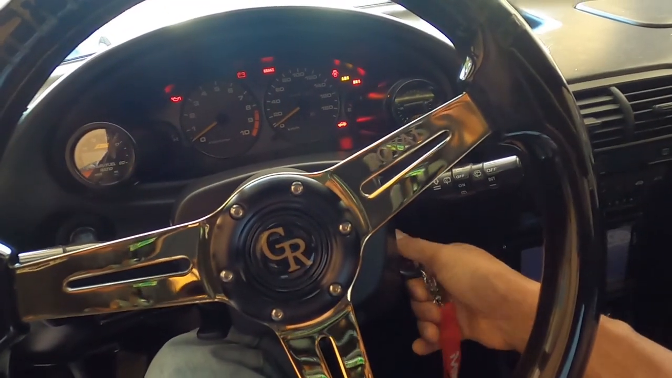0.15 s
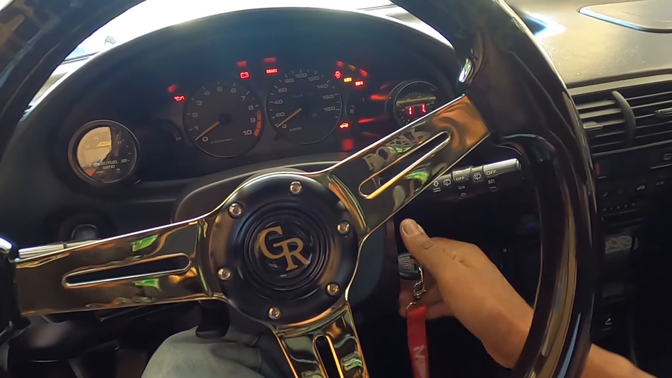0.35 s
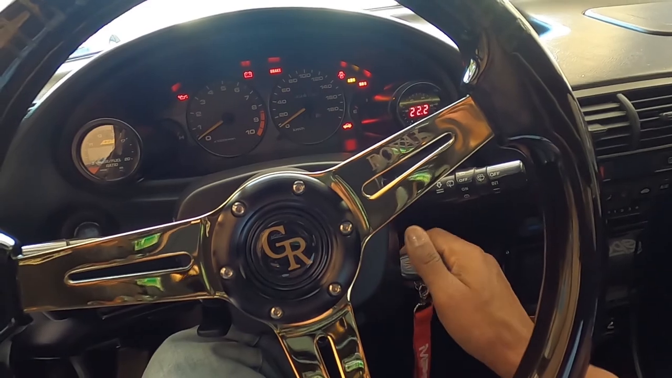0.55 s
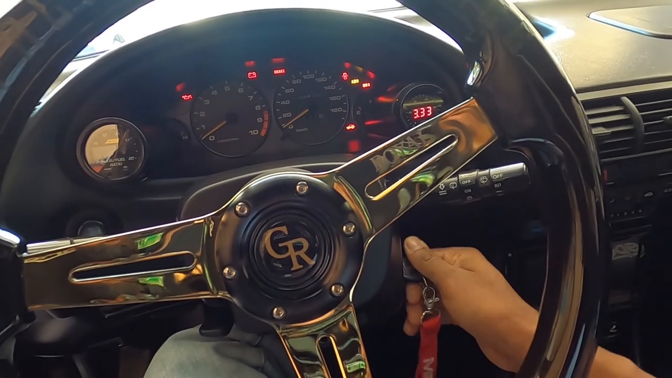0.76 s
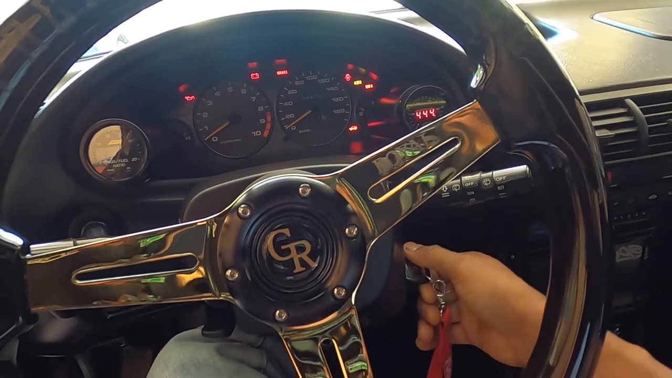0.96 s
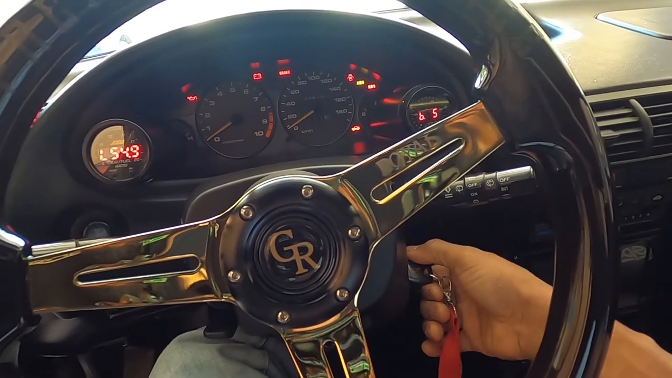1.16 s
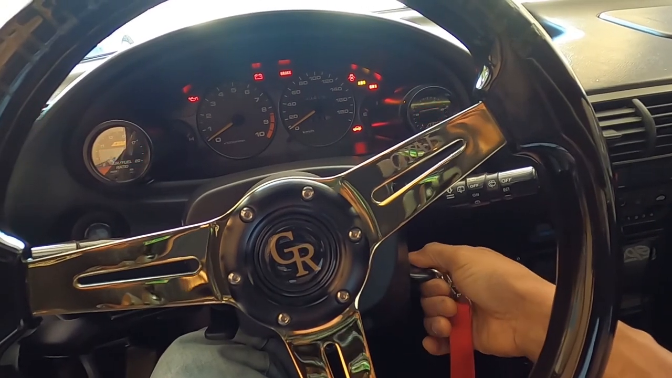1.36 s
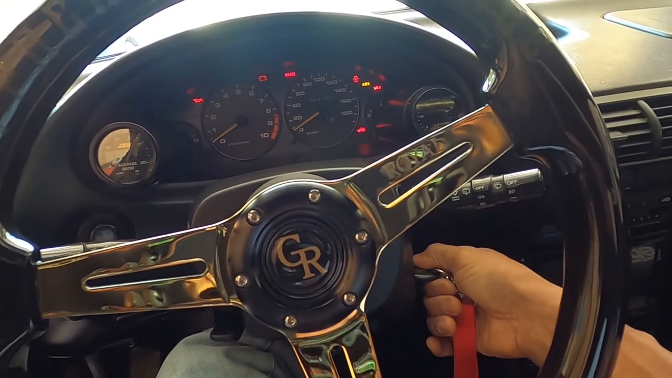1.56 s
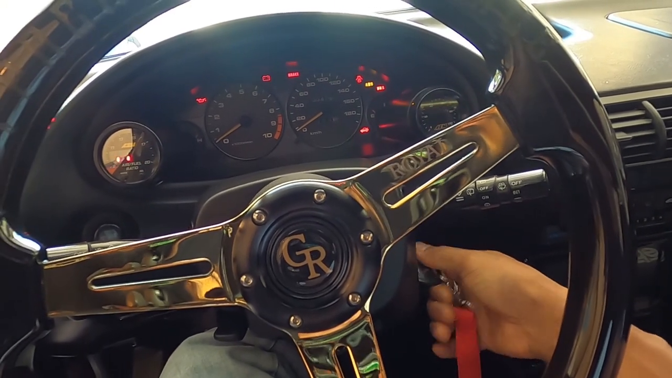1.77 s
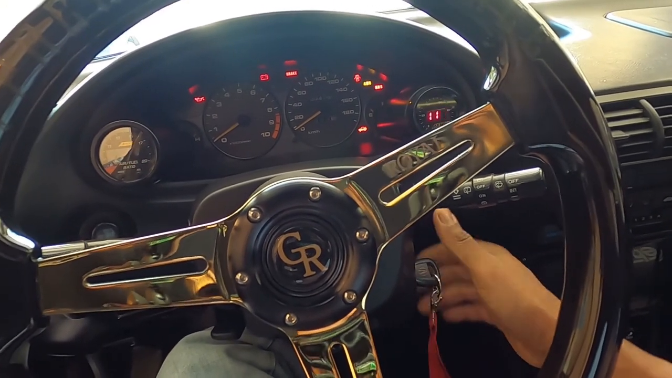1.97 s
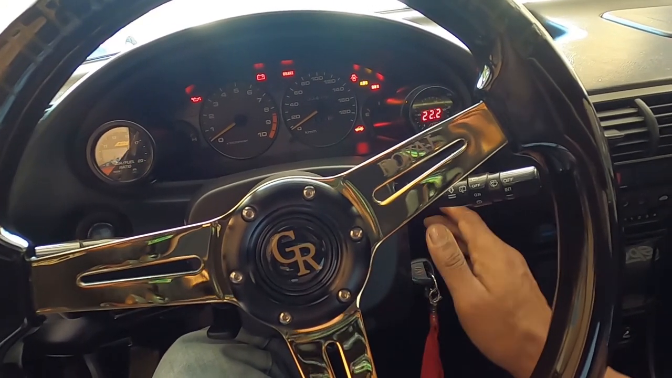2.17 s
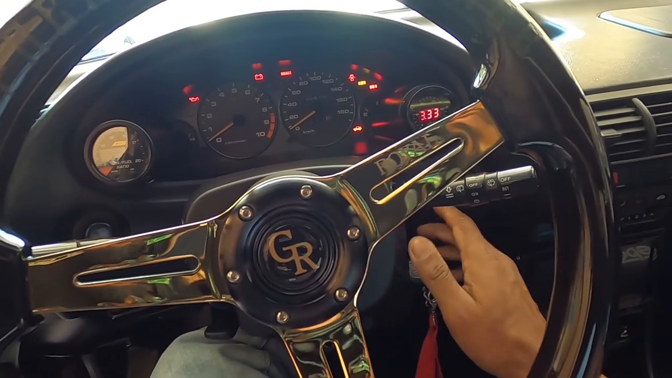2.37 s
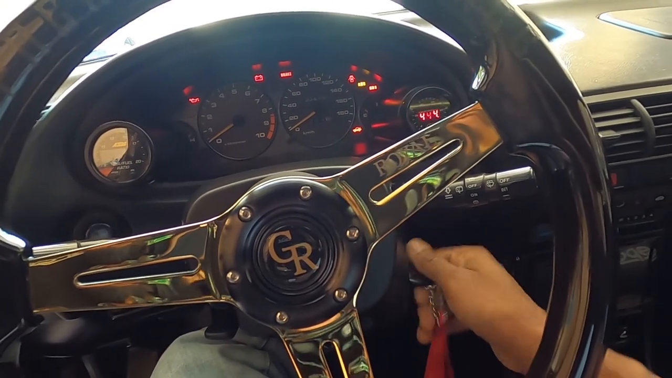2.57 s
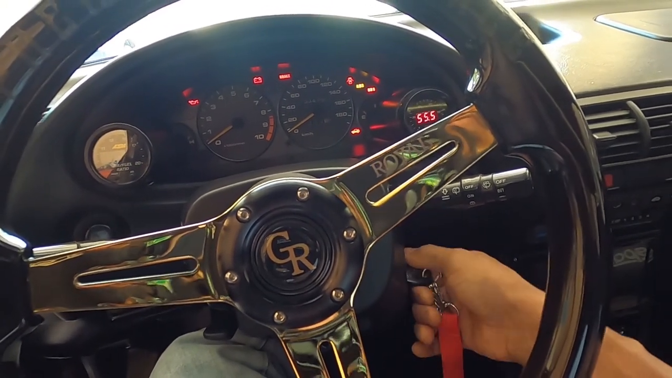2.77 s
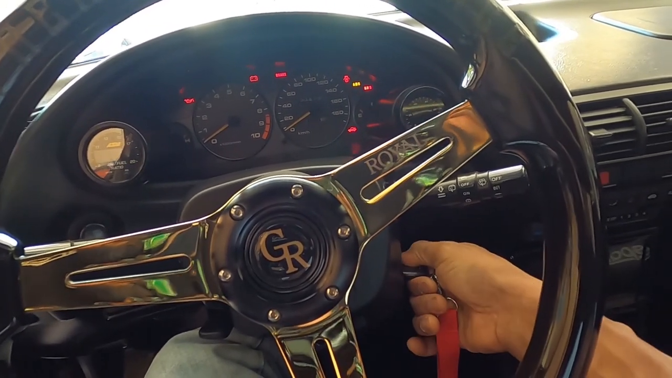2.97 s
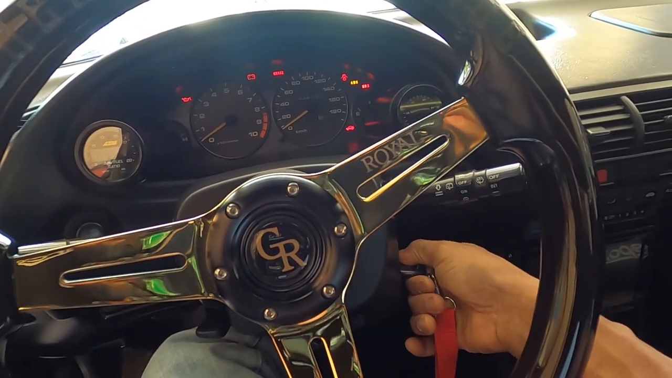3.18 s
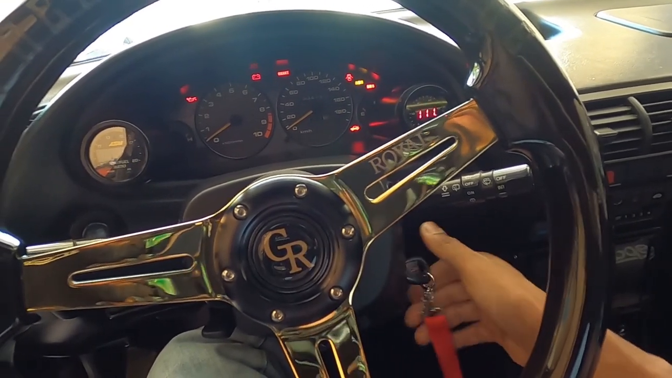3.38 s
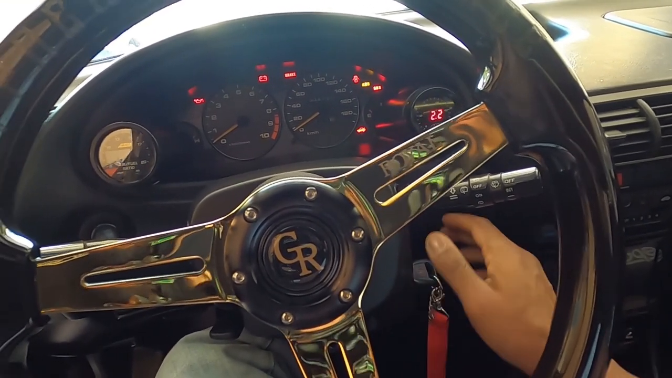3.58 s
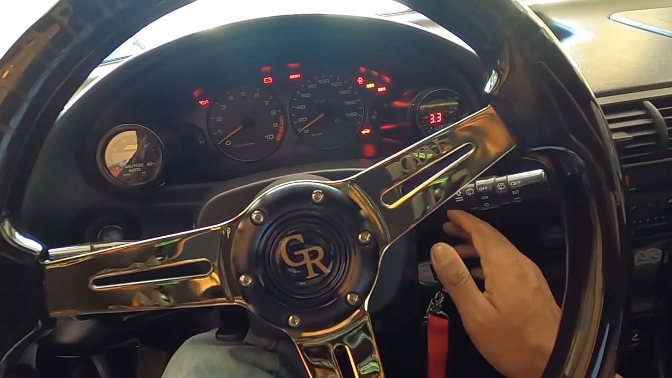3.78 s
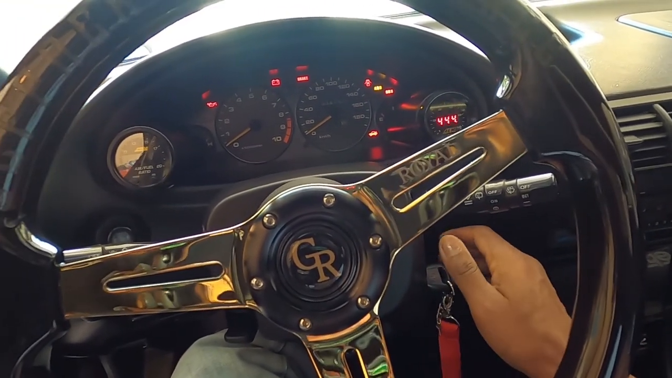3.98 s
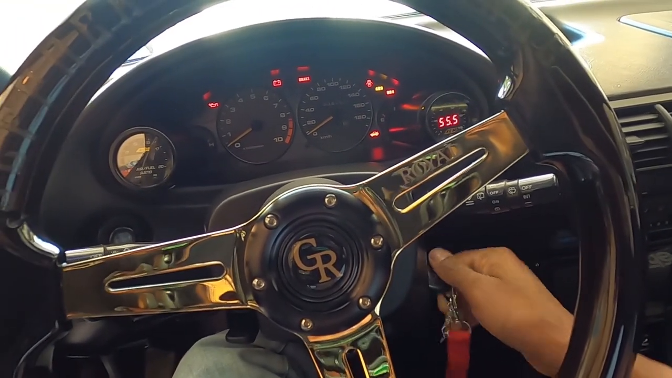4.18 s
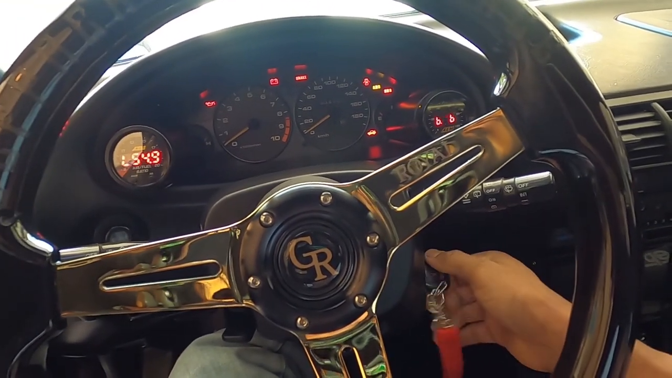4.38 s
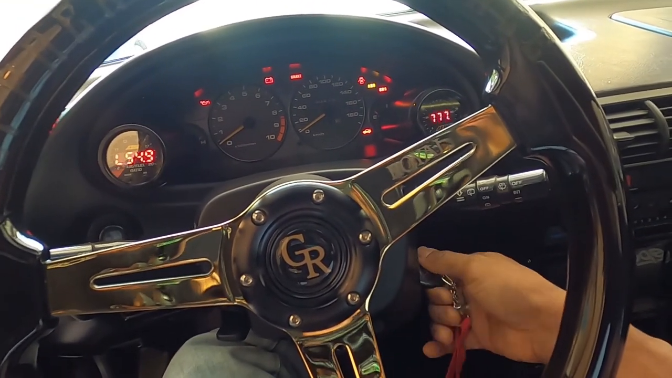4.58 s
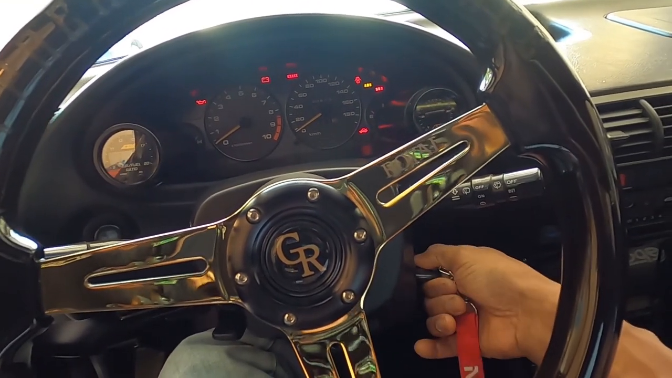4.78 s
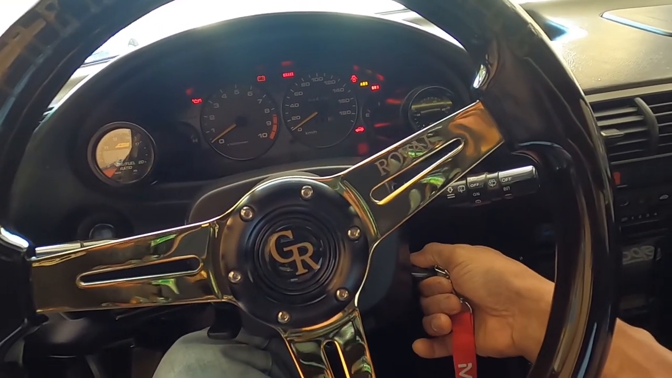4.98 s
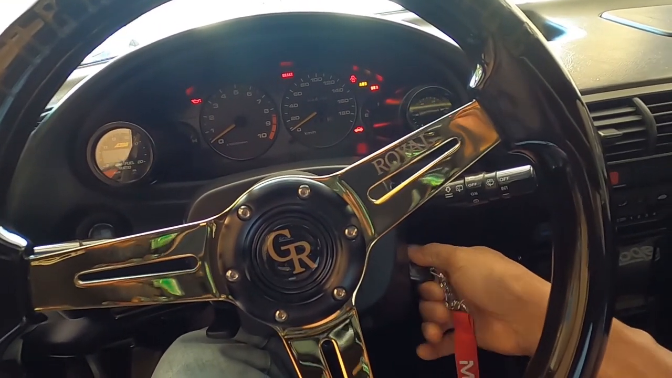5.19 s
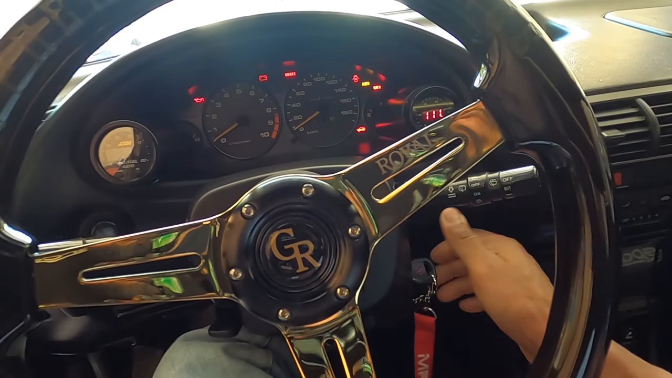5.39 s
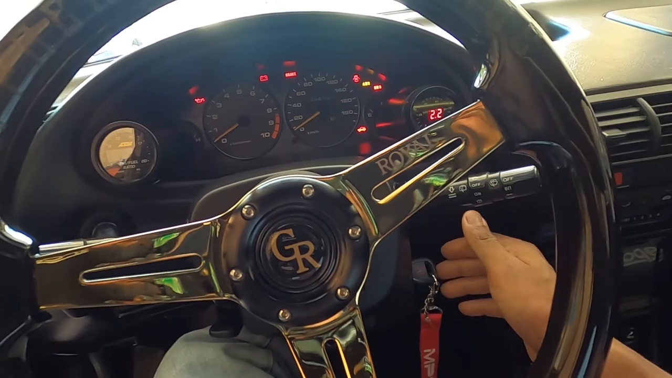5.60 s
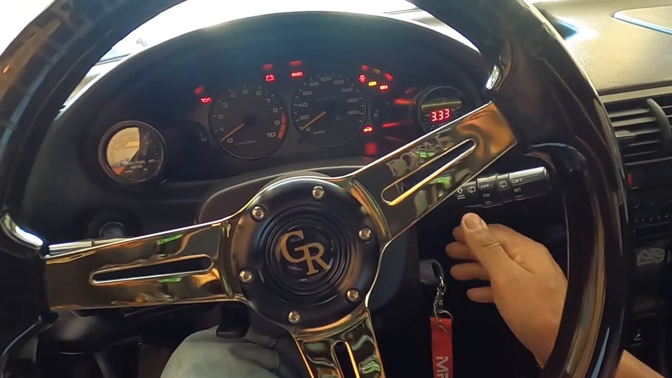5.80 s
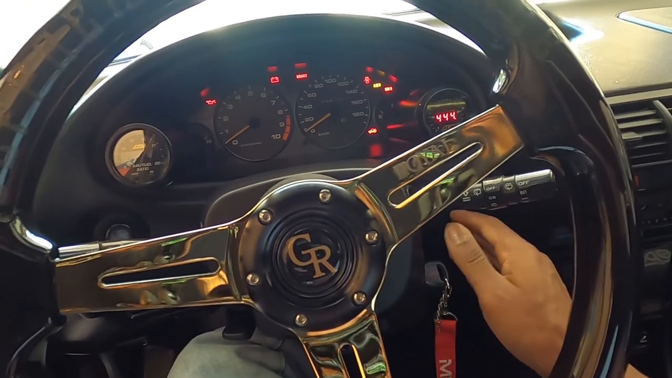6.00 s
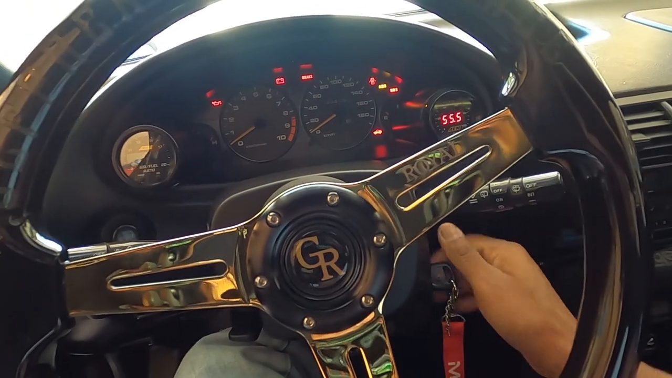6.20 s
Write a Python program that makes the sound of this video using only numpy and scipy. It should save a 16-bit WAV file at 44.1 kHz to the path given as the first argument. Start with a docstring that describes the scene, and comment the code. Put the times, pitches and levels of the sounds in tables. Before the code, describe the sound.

Inside a car, a key clicks and the starter grinds in short whirring bursts, cabin booming deeply; the engine never catches, keys tinkle between.

```python
"""Inside a car in a garage: the ignition key is turned four times, the engine never catches.
Noise through housing modes and a rising gear whine make the starter; beating sines near 42 Hz make the
cabin boom as the engine rocks on its mounts. On release the key springs back and the starter coasts down.
Noise bursts make the lock clicks, decaying sines the key rings, sines and soft noise the hum and rush."""
import sys
import numpy as np
from scipy import signal
from scipy.fft import rfft, irfft, next_fast_len
from scipy.io import wavfile
from scipy.ndimage import map_coordinates

SR = 44100
rng = np.random.default_rng(int(sys.argv[2]) if len(sys.argv) > 2 else 0)


def output_pcm(signal):
    """Save a mono or channel-first signal as 16-bit PCM at the path in sys.argv[1].

    Samples are clipped to [-1, 1] before scaling.
    """
    pcm = np.clip(np.atleast_2d(signal).T, -1, 1) * 32767
    wavfile.write(sys.argv[1], SR, np.round(pcm).astype(np.int16))


N = 275622

# tries: starter on t/s, key released t/s, coasting time/s, gear mesh spin-up/(Hz/s),
# rel. grind level/dB, rel. whine level/dB, rel. release level/dB
TRIES = [(-.19, 0.157, 0.4, 4000, -33, 5, -29), (1.463, 1.868, 0.41, 3698, -33.5, 4, -26),
         (2.938, 3.341, 0.52, 4102, -34, 2, -24.5), (4.768, 5.298, 0.76, 4100, -33, 6.5, -26.5)]
# starter heaves the engine over: t/s, rel. level/dB, hold/s, rocking f/Hz, rel. after-swing level/dB,
# beat period/s, rel. compression stroke level/dB
HEAVES = [(-.065, -11, 0.18, 44.2, -19.5, 0.238, -34.5), (1.538, -9.5, 0.15, 43.55, -18, 0.2264, -33.5),
          (3.015, -11, 0.21, 43.2, -20, 0.217, -30.5), (4.825, -11, .21, 42.84, -34, 0.18, -33.5),
          (5.152, -10.5, .16, 50.5, -38.5, 0.74, -44.5), (5.361, -10.5, 0.1165, 49.37, -16, 0.293, -54)]
# spectrum of the loaded grind: f/Hz, rel. density/dB
GRIND_SPECTRUM = [(260, -28.5), (450, -19), (560, -11), (737, -5.5), (827, -7), (938, 2), (1020, -2.5),
                  (1390, -4.5), (2050, -10.5), (2410, -9), (2860, -17), (5310, -22), (7000, -31.5),
                  (9100, -61.5), (15400, -120)]
# left-right likeness of wide sounds: f/Hz, likeness [0-1]
WIDE_LIKENESS = [(100, 1), (250, .98), (500, .92), (1000, .84), (2000, .7), (4000, .33), (8000, .05)]
# left-right likeness of near sounds: f/Hz, likeness [0-1]
NEAR_LIKENESS = [(300, 0.99), (1000, 0.84), (4000, 0.63), (9000, 0.11)]
# resonances of the plastic column shroud: f/Hz, width/Hz, rel. level/dB
SHROUD_MODES = [(1034, 28, 4), (1200, 140, 3.5), (1460, 24, -5), (1723, 210, 1), (2380, 40, 3.5),
                (2820, 28, -1), (3205, 35, -2.8)]


def amp(db):
    """Decibels to gain."""
    return 10 ** (np.asarray(db) / 20)


def unit(x):
    """Scale to rms 1."""
    return x / np.sqrt(np.mean(x ** 2) + 1e-20)


def clock():
    """Time of each sample, s."""
    return np.arange(N) / SR


def along(points, hz):
    """Interpolate (Hz, value) points on a log frequency axis."""
    f, v = np.transpose(points)
    return np.interp(np.log(hz + 1), np.log(f + 1), v)


def gate(start, end, rise, fall):
    """Linear rise from start, hold, exponential decay after end."""
    t = clock()
    return np.clip((t - start) / rise, 0, 1) * np.exp(-np.maximum(t - end, 0) / fall)


def swell(s, length):
    """Gaussian rise and fall around time s."""
    return np.exp(-((clock() - s) / length) ** 2)


def burst(s, rise, t60):
    """Envelope of one contact."""
    return gate(s, s + rise, rise, t60 / np.log(1000))


def wobble(rate):
    """Smooth random curve, rate knots a second."""
    knots = rng.standard_normal(int(N * rate / SR) + 4)
    return map_coordinates(knots, [clock() * rate])


def noise():
    """Two unrelated white noises."""
    return rng.standard_normal((2, N))


def filtered(x, response):
    """Apply a response of frequency to x."""
    m = next_fast_len(N + SR // 2)
    return irfft(rfft(x, m) * response(np.fft.rfftfreq(m, 1 / SR)), m)[..., :N]


def ringing(x, modes, ring_db, direct=1):
    """x scaled by direct, plus x through parallel second-order resonances."""
    def response(f):
        total = direct
        for center, width, db in modes:
            damping = 1j * f * width
            total = total + amp(db + ring_db) * damping / (center * center - f * f + damping)
        return total
    return filtered(x, response)


def spread(pair, spectrum, alike, lean_db=0):
    """Colour two unrelated signals, blend to the given left-right likeness, lean by lean_db to the left."""
    def response(hz):
        turn = np.arccos(np.clip(along(alike, hz), -1, 1)) / 2
        return unit(amp(along(spectrum, hz))) * [np.cos(turn), np.sin(turn)]
    mid, side = filtered(pair, response)
    return np.array([mid + side, mid - side]) * amp([[lean_db / 2], [-lean_db / 2]])


def echo(x, t60):
    """Diffuse decaying noise tail for each ear, scaled to unit energy on the left."""
    t = np.arange(SR // 2) / SR
    tail = rng.standard_normal((2, len(t))) * amp(-60 * t / t60)
    return signal.fftconvolve(np.atleast_2d(x), tail / np.linalg.norm(tail[0]), axes=1)[:, :N]


def garage():
    """Mains hum (sine harmonics) over the faint rush of the room; both sink with each heave and recover."""
    # hum partials: f/Hz, rel. level/dB
    hum_partials = [(51.1, -42.5), (102.2, -37.5), (153.2, -51), (204.4, -55), (306.6, -66.5)]
    # room rush: f/Hz, rel. density/dB
    air_spectrum = [(15, -25.5), (25, 1.5), (112, -12), (150, -12), (224, -17), (354, -54), (415, -34.5),
                    (879, -55.5), (1090, -42), (1500, -39.5), (2240, -48), (9020, -62.5), (10600, -95.5),
                    (15000, -90)]
    far_spectrum = [(300, 7.5), (600, -4.5), (1100, -5.5), (1600, -11.5), (2400, -4.0), (4000, -16.5),
                    (9000, -33.0), (11500, -45.0)]
    hum_offset_db, hum_dip_db, rush_dip_db, recover_s = 6, 10, 3, 0.53
    t = clock()
    dip = np.max([gate(s, s + hold, .03, recover_s) for s, _, hold, *_ in HEAVES], axis=0)
    hum = np.zeros(N)
    for hz, db in hum_partials:
        level_db = db + hum_offset_db - hum_dip_db * dip + 1.8 * wobble(4.31)
        hum += amp(level_db) * np.sin(2 * np.pi * hz * t + 0.68 * wobble(4.3))
    air = spread(noise(), air_spectrum, WIDE_LIKENESS, lean_db=3.0) * amp(-41.5 + 2.2 * wobble(1.8))
    far = spread(noise(), far_spectrum, WIDE_LIKENESS, lean_db=10) * amp(-63.5 + wobble(8.7))
    return hum + amp(-rush_dip_db * dip) * (air + far)


def thuds():
    """Soft knocks and groans as the drivetrain settles: sines of unsteady phase with inharmonic overtones."""
    # thuds: t/s, rel. level/dB, nominal f/Hz, half length/s, rel. overtone level/dB
    thud_events = [(.015, -30.5, 330, 0.028, -8.5), (.335, -29, 125, 0.042, -12.5),
                   (1.249, -36.5, 126.4, 0.28, -35), (5.167, -19.5, 129.6, 0.018, -32),
                   (5.243, -11.5, 143, 0.0069, -33), (6.02, -43, 210, 0.063, -7)]
    # overtones: multiple of nominal f, rel. level/dB
    overtones = [(1.43, 0), (1.88, -4)]
    out = np.zeros(N)
    for s, db, hz, length, overtones_db in thud_events:
        def tone(multiple):
            return np.sin(2 * np.pi * multiple * hz * (clock() - s) + 1.13 * wobble(45))
        body = tone(0.99) + sum(amp(overtones_db + level) * tone(k) for k, level in overtones)
        out += amp(db) * swell(s, length) * body
    return out


def fingers():
    """Keys rustle in the hand (unevenly modulated noise); faint squeaks are sines of unsteady phase."""
    # handling: t/s, level/dB, half length/s
    handling = [(.5, -58.5, .035), (1.05, -75.5, .08), (2.18, -57, 0.041), (2.67, -55.5, .07),
                (3.883, -66, .04), (4.284, -49.5, .035), (4.4, -61.5, .051), (4.516, -50, 0.04),
                (4.68, -56.5, 0.14), (5.141, -44, .02)]
    # squeaks: t/s, level/dB, half length/s, f/Hz
    squeaks = [(.93, -68, 0.04, 2800), (1.353, -59, 0.037, 2360)]
    # rustle spectrum: f/Hz, rel. density/dB
    rustle_spectrum = [(1060, -26), (1800, 0.5), (2460, -0.5), (2870, -5), (3340, -6.5), (4340, -5.5),
                       (6380, -7.5), (7370, -13.5), (7920, -5.5), (9390, -5), (11400, -19.5),
                       (14300, -14.5), (15400, -30)]
    rub = sum(amp(db) * swell(s, length) for s, db, length in handling)
    grains = unit(noise() * amp(4.2 * wobble(150)))
    rustle = spread(grains * rub, rustle_spectrum, NEAR_LIKENESS)
    squeak = np.zeros(N)
    for s, db, length, hz in squeaks:
        squeak += amp(db) * swell(s, length) * np.sin(2 * np.pi * hz * clock() + 2 * wobble(300))
    return rustle + squeak


def keys():
    """A hanging key rings until touched; mode strengths and phases vary by touch and ear."""
    # chinks: t/s, rel. level/dB, ring time before damping/s
    chinks = [(.355, -56, 0.027), (.785, -63.5, 0.047), (2.08, -47, 0.04), (2.744, -58, 0.023),
              (3.644, -64, 0.018), (4.402, -41.5, 0.12), (4.687, -35.5, 0.064)]
    # key modes: f/Hz, rel. level/dB
    key_modes = [(8834, 0), (9216, -15), (11900, -31)]
    t, out = clock()[:SR // 3], np.zeros((2, N + SR))
    for s, db, length in chinks:
        ring = np.zeros((2, len(t)))
        for hz, level in key_modes:
            strength = amp(level + rng.normal(0, 1.8, (2, 1)))
            ring += strength * np.sin(2 * np.pi * (hz * t + rng.random((2, 1)) / 4))
        touched = 1 / (1 + (t / length) ** 8)
        fade = (1 - np.exp(-t / .002)) * amp(-60 * t / 0.24) * touched
        out[:, round(s * SR):][:, :len(t)] += amp(db) * fade * ring
    return out[:, :N]


def contacts():
    """List all lock contacts: t/s, rel. snap, knock and tick levels/dB, t60/s."""
    # detent, then start contact: lead/s, rel. snap level/dB, rel. column knock level/dB,
    # rel. thin key tick level/dB, t60/s
    turn_clicks = [(0.0432, -23, -41, -50.5, 0.034), (0.0022, -17.5, -32.5, -24, 0.062)]
    # other clicks: t/s, rel. snap level/dB, rel. column knock level/dB, rel. thin key tick level/dB
    other_clicks = [(0.467, -41.5, -58, -64), (.828, -60, -58, -64), (.998, -51, -53.5, -74),
                    (1.394, -38.5, -46, -65), (2.077, -24, -59, -35), (2.177, -45, -69, -48),
                    (2.568, -29, -32.5, -55), (2.596, -48, -43.5, -40.5), (2.62, -45, -45, -44),
                    (2.655, -28.5, -39, -54), (2.703, -36, -51.5, -47), (2.742, -38.5, -54, -48),
                    (4.273, -44, -38.5, -39), (4.297, -58, -51, -43.5), (4.468, -43, -45.5, -49),
                    (4.504, -44, -46.5, -51.5), (4.564, -17, -41.5, -19), (4.687, -48, -62, -49),
                    (5.452, -39, -44.5, -38.5), (5.934, -36, -37.5, -55)]
    turns = [(on - lead, *click) for on, *_ in TRIES if on > 0 for lead, *click in turn_clicks]
    click_t60_s = 0.03
    return turns + [(*click, click_t60_s) for click in other_clicks]


def lock():
    """Noise bursts through barrel and shroud modes: tumblers snap, key ticks, plastic column knocks."""
    # barrel resonances: f/Hz, width/Hz, rel. level/dB
    barrel_modes = [(2990, 81, -4), (4070, 130, -0.5), (4385, 240, 2.5), (5360, 240, 1), (7550, 100, 5.5),
                    (9000, 170, 1), (9530, 150, 1.5)]
    # column knock spectrum: f/Hz, rel. density/dB
    column_spectrum = [(120, -36.5), (200, 0.5), (497, -8), (983, -13), (1460, -18), (1790, -14.5),
                       (2960, -14.5), (3220, -26), (3500, -10.5), (4550, -52), (7700, -120)]
    steel = [(1000, -10.5), (1800, 1.0), (3000, 1), (4500, -2.5), (6500, -11), (9000, -15), (12000, -27.5)]
    thin = [(3500, -19.5), (6000, 0.5), (7300, 0), (9500, -2.5), (11300, -12.5), (15000, -18.5)]
    snap, tick, knock, ping = np.zeros((4, N))
    for s, db, knock_db, tick_db, t60 in contacts():
        # hard contacts are sudden, dull ones slide in
        rise = np.interp(tick_db, [-44, -30], [.006, .0025])
        contact = burst(s - rise / 2, rise, t60) + amp(-19) * swell(s, 0.011)
        snap += amp(db) * contact
        tick += amp(tick_db) * contact
        knock += amp(knock_db) * burst(s, 0.0055, 0.11)
        # one small steel part rings at its own pitch
        ping_hz = 3900 + 1100 * rng.random()
        ping += amp(db - 14) * burst(s, .002, .03) * np.sin(2 * np.pi * ping_hz * clock())

    def barrel(force):
        chatter = unit(noise() * amp(3.3 * wobble(700)))
        return ringing(chatter * force, barrel_modes, ring_db=-1, direct=.8)

    snaps = amp(-12.0) * spread(barrel(snap), steel, NEAR_LIKENESS, lean_db=1.0)
    ticks = amp(-3) * spread(barrel(tick), thin, NEAR_LIKENESS, lean_db=0.5)
    plastic = ringing(noise() * knock, SHROUD_MODES, ring_db=2, direct=.8)
    knocks = amp(-1.5) * spread(plastic, column_spectrum, NEAR_LIKENESS, lean_db=1.5)
    return snaps + ticks + ping + knocks


def release():
    """Noise bursts: the sprung key scrapes back and the pinion clacks out of the ring gear."""
    spring = [(1500, -2.0), (3500, 6), (6000, 0), (9500, -1.5), (11500, -19.0), (15000, -25)]
    scrape, clack = np.zeros((2, N))
    for _, off, *_, db in TRIES:
        scrape += amp(db - 7.5) * swell(off, 0.01) + amp(db - 10.5) * burst(off, 0.0024, 0.033)
        clack += amp(db - 2.0) * burst(off, 0.011, 0.12)
    scraping = spread(noise() * scrape, spring, NEAR_LIKENESS, lean_db=-2.5)
    struck = ringing(noise() * clack, SHROUD_MODES, ring_db=-9)
    return scraping + spread(struck, GRIND_SPECTRUM, WIDE_LIKENESS, lean_db=2.5)


def boom():
    """Each heave rocks the engine and pumps cabin air: driven swing, then two close free modes that beat."""
    first_swing_hz, first_swing_db, first_swing_s, heave_fall_s = 52.4, 3, 0.019, 0.046
    mount_hz, second_mode_db, mount_db_per_s = 41.8, -8.5, 19.5
    shudder_spectrum = [(10, -13.5), (25, -2.5), (70, 0.5), (110, -18), (200, -46.5), (500, -80.0)]
    t, out = clock(), np.zeros((2, N))
    for s, db, hold, rock_hz, after_db, beat_s, _ in HEAVES:
        age = np.maximum(t - s, 0)
        first = np.exp(-age / first_swing_s)
        driven = gate(s, s + hold, .007, heave_fall_s)
        free = (t > s + hold) * (1 - driven) * amp(after_db - mount_db_per_s * (age - hold))
        hz = mount_hz + (rock_hz - mount_hz) * gate(s, s + hold, .007, .12)
        hz = hz + (first_swing_hz - rock_hz) * first
        beat = amp(second_mode_db) * np.exp(2j * np.pi * age / beat_s)
        motion = amp(db + first_swing_db * first) * driven * (1 + 0.26 * beat) + free * (1 + beat)
        phase = 2 * np.pi * np.cumsum(hz * (t >= s)) / SR + np.angle(motion) + .15 * wobble(25)
        second = amp(-25 + 4.1 * wobble(23)) * np.sin(2 * phase)
        third = amp(-31.5 + 1.5 * wobble(30)) * np.sin(3 * phase)
        swing = np.sin(phase) + second + third
        shudder = spread(noise(), shudder_spectrum, WIDE_LIKENESS)
        out += np.sqrt(2) * np.abs(motion) * (swing + amp(-16) * shudder)
    # opposite polarity in the two ears
    return out * amp([[.22], [-.22]])


def gears(top_hz, rough, strongest, length):
    """Gear mesh sweeps up as the starter gathers speed, then sags after release: tooth rhythm and whine."""
    t, teeth, whine = clock(), np.zeros(N), np.zeros(N)
    for on, off, coast, spin_up, _, whine_db, _ in TRIES:
        mesh_hz = np.clip(spin_up * (t - on), 0, top_hz) * np.exp(-np.maximum(t - off, 0) / 1.5)
        phase = 2 * np.pi * np.cumsum(mesh_hz * (1 + rough * wobble(120))) / SR
        teeth += gate(on, off + coast, 0.0054, .05) * np.cos(phase)
        tone = np.sin(phase) + amp(-3) * np.sin(2 * phase) + amp(-17) * np.sin(3 * phase)
        whine += amp(whine_db) * swell(on + strongest, length) * tone
    return teeth, whine


def panels(pair, t60):
    """Countless small panel resonances, as a noise tail, give each ear its own jagged colour."""
    return unit(1.3 * pair + echo(pair, t60))


def effort():
    """Grind, hiss and block envelopes: motor takes up load, is let go, brakes evenly to rest."""
    # the grind swells under load, sags while the key is held
    load_at_s, load_width_s, load_db, sag_db_per_s = 0.2, 0.1, 5.5, 3.5
    # coasting grind: drop, power law of speed
    coast_drop_db, coast_power = -3.5, 1.01
    # brush hiss: level under power, power law of speed
    brush_db, brush_power = -46, 3.25
    block_db, block_coast_db = -36.5, -41
    # compression strokes
    stroke_offset_db, stroke_lag_s, stroke_gap_s, stroke_s, stroke_loss_db = 7.5, 0.036, 0.11, 0.051, 5.5
    # the pinion jolts the starter as it drops out; grind level is relative
    jolt_grind_db, jolt_hiss_db, jolt_block_db, jolt_s = -46.5, -47.5, -31.5, 0.032
    churn_db, churn_per_s = 0.53, 24
    t = clock()
    grind, hiss, block = np.zeros((3, N))
    for on, off, coast, _, grind_db, _, _ in TRIES:
        powered = gate(on, off, 0.0083, 0.025)
        speed = (t > on) * np.clip(1 - (t - off) / coast, 1e-9, 1)
        coasting = (1 - powered) * speed ** coast_power
        swell_db = load_db * swell(on + load_at_s, load_width_s) - sag_db_per_s * np.clip(t - on, 0, off - on)
        jolt = swell(off + 0.013, jolt_s)
        grind += amp(grind_db + swell_db) * (powered + amp(coast_drop_db) * coasting)
        grind += amp(jolt_grind_db) * jolt
        hiss += amp(brush_db) * speed ** brush_power + amp(jolt_hiss_db) * jolt
        block += amp(block_db) * powered + amp(block_coast_db) * coasting + amp(jolt_block_db) * jolt
    for s, *_, db in HEAVES:
        for k in range(2):
            level = amp(db + stroke_offset_db - k * stroke_loss_db)
            block += level * swell(s + stroke_lag_s + k * stroke_gap_s, stroke_s)
    return grind * amp(churn_db * wobble(churn_per_s)), hiss, block


def starter():
    """Tooth-modulated noise rattles the housing modes, brushes hiss, the block rumbles, the whine sings."""
    # starter housing resonances: f/Hz, width/Hz, rel. level/dB
    housing_modes = [(761, 20, -3), (922, 32, -6), (1040, 21, -15), (1330, 6.3, -14.5), (1480, 11, -6),
                     (1507, 23, -6.5), (1990, 6, -8.5), (2308, 16, 3.5), (2886, 93, -4), (5100, 24, 10.5)]
    # engine block resonances: f/Hz, width/Hz, rel. level/dB
    block_modes = [(306, 12, -5), (345.6, 12, 2)]
    # spectra of coasting grind, brush hiss and block rumble: f/Hz, rel. density/dB
    coast_spectrum = [(260, -40), (450, -33.5), (493, -14.5), (781, -13), (949, 2.5), (1170, -3),
                      (1520, -6), (1960, -13.5), (2380, -13), (2890, -17.5), (4180, -24.5), (5080, -23),
                      (7000, -35), (9100, -68.5), (15400, -120)]
    hiss_spectrum = [(1760, -11.5), (3000, -8), (3860, -9.5), (4340, -9.5), (5330, -11.5), (7050, -17.5),
                     (9400, -13.5), (11300, -28.5), (14400, -37), (15400, -43.5)]
    block_spectrum = [(38, -40), (65, -1), (81, -15), (156, -14.5), (210, -23.5), (269, -25.5),
                      (307, -23.5), (557, -38), (700, -43.5), (910, -65), (1540, -120)]
    # left over right: f/Hz, level difference/dB
    left_lean = [(100, .4), (500, 2), (1000, 3), (2000, 6.3), (4000, 4.7), (8000, 3.4)]
    grind, hiss, block = effort()
    engaged = np.clip(sum(gate(on, off, 0.003, 0.062) for on, off, *_ in TRIES), 0, 1)
    teeth, whine = gears(top_hz=1090, rough=.018, strongest=.22, length=.09)
    impacts = unit(noise() * (1 + .5 * teeth) * amp(1.2 * wobble(130)))
    impacts = panels(impacts, t60=.3)
    metal = unit(ringing(impacts, housing_modes, ring_db=-9))
    # equal-power crossfade from loaded to free running
    loaded = amp(-0.5) * np.sqrt(engaged) * spread(metal, GRIND_SPECTRUM, WIDE_LIKENESS)
    free = amp(-4) * np.sqrt(1 - engaged) * spread(metal, coast_spectrum, WIDE_LIKENESS)
    # each resonance sings on after the rising whine has crossed it
    sung = ringing(whine, housing_modes, ring_db=0, direct=.12)
    singing = amp(2.5) * sung + amp(-8) * echo(sung, t60=.3)
    brushes = hiss * spread(impacts, hiss_spectrum, WIDE_LIKENESS)
    rumble = block * spread(ringing(noise(), block_modes, ring_db=1.0), block_spectrum, WIDE_LIKENESS)

    def ears(hz):
        # louder on the left, yet 50 us earlier on the right
        level = amp(np.outer([.5, -.5], along(left_lean, hz)))
        return level * np.exp(np.outer([-1j, 1j], np.pi * hz * 5e-5))

    return filtered(grind * (loaded + free + singing) + brushes + rumble, ears)


def scene():
    """Sum all layers; near sounds get the short ring of the cabin."""
    near = lock() + release() + keys() + fingers()
    cabin = echo(near, t60=.16)
    return garage() + thuds() + near + amp(-12.5) * cabin + boom() + starter()


def record(dry):
    """Round off the biggest swings towards 0.7, then cut everything from the band limit up."""
    ceiling, band_limit_hz = .7, 15600
    rounded = dry / (1 + np.abs(dry / ceiling) ** 8) ** (1 / 8)
    return filtered(rounded, lambda hz: hz < band_limit_hz)


dry = scene()
out = record(dry)
output_pcm(out)
```